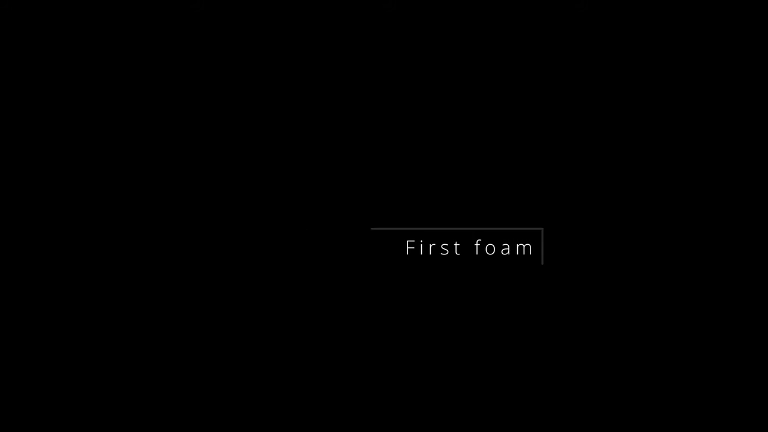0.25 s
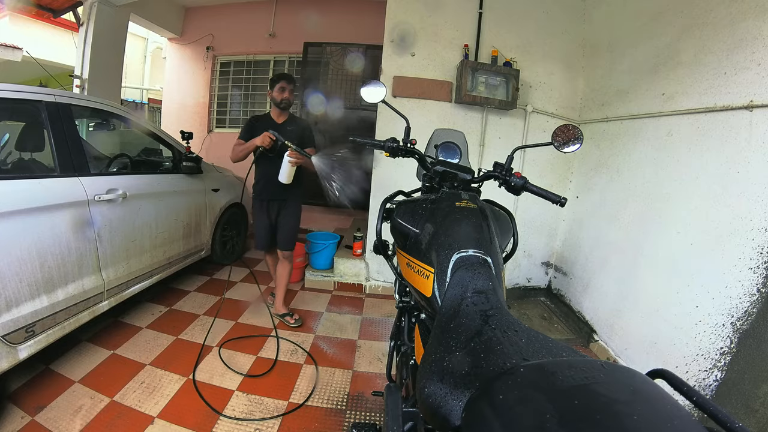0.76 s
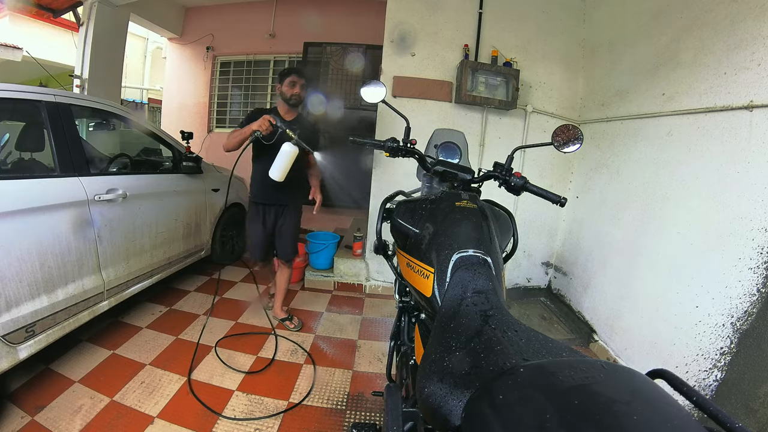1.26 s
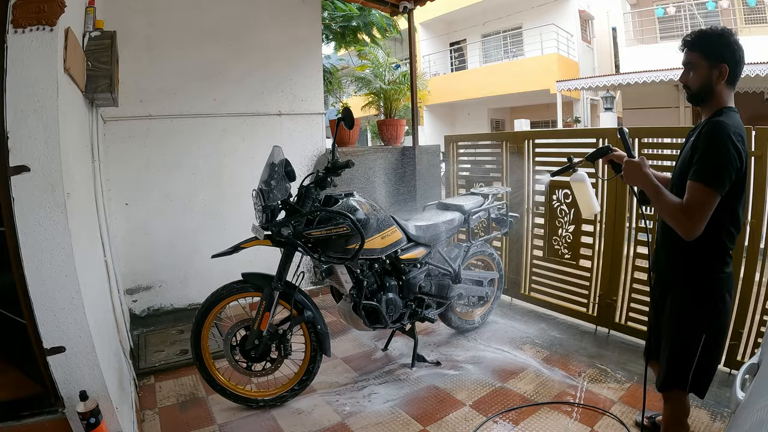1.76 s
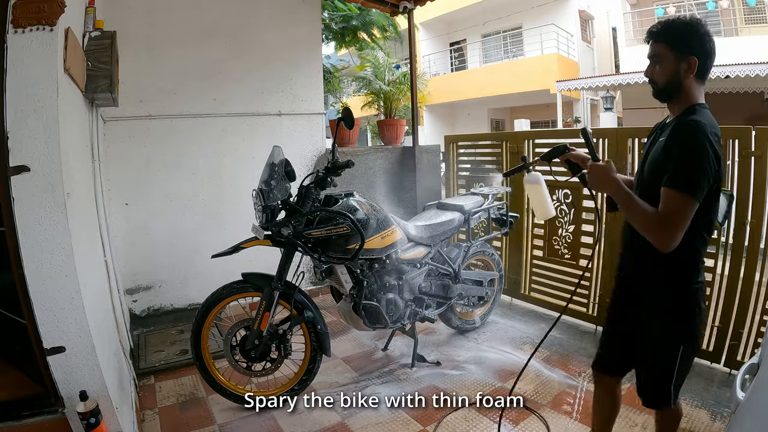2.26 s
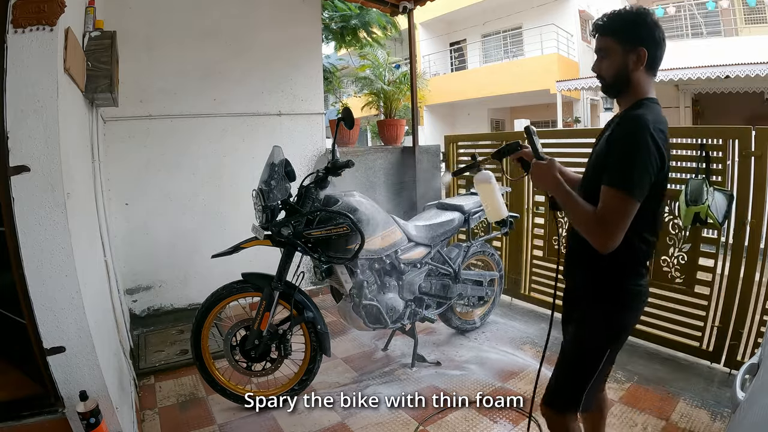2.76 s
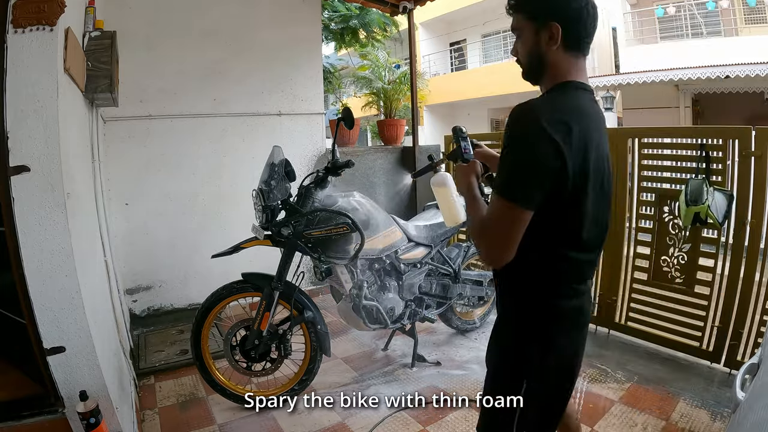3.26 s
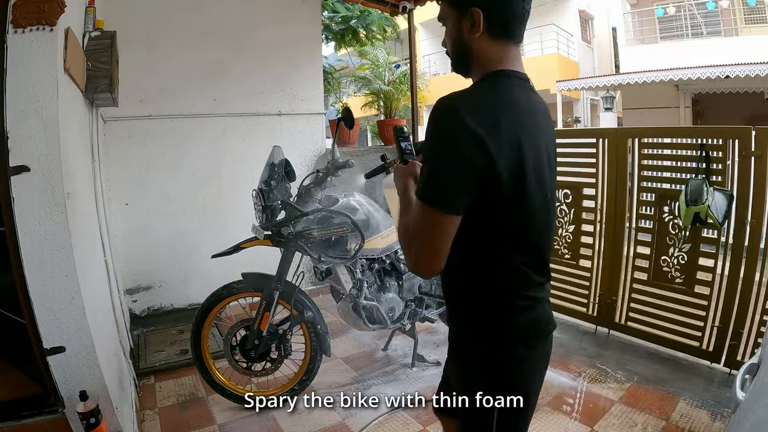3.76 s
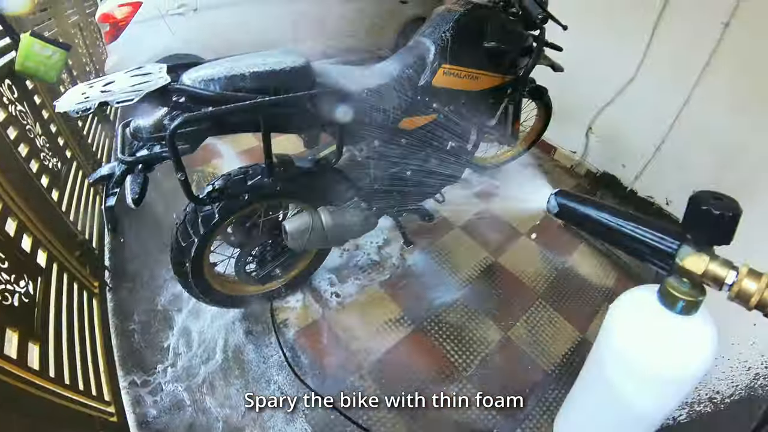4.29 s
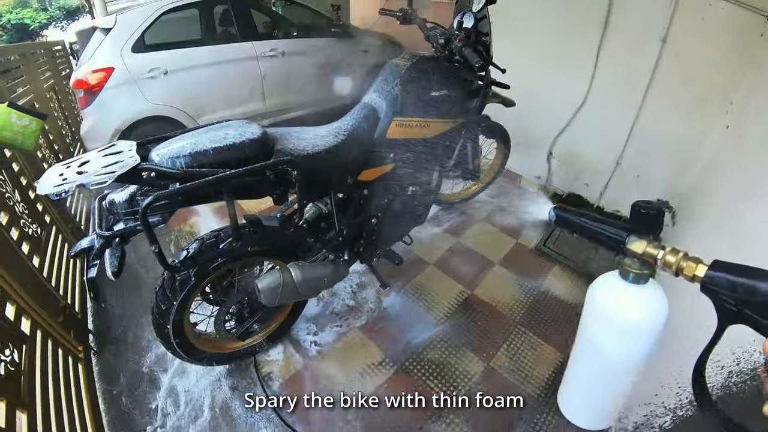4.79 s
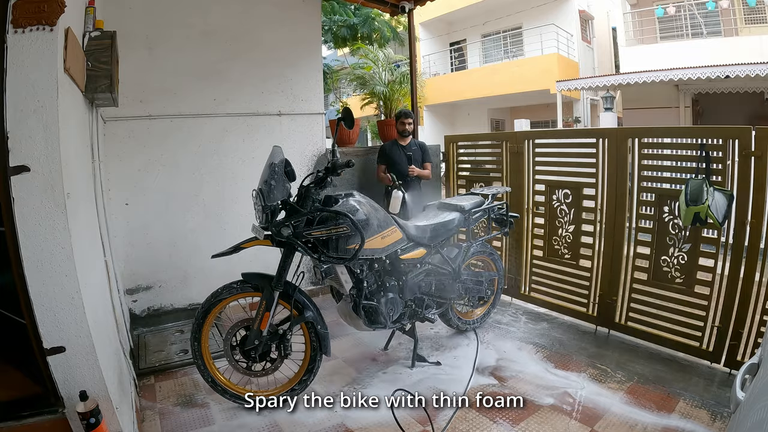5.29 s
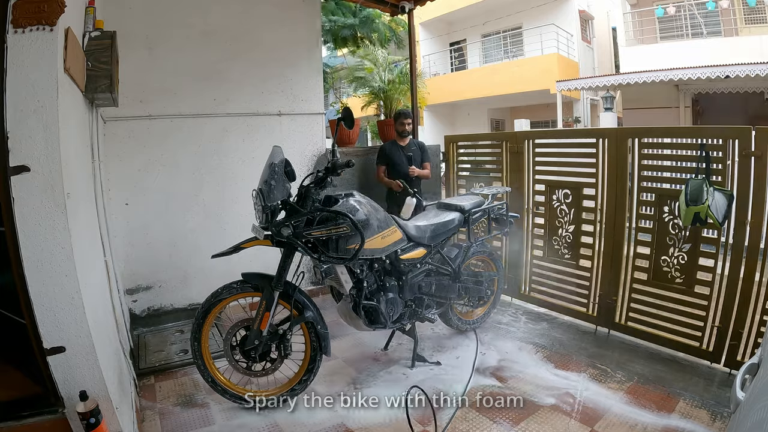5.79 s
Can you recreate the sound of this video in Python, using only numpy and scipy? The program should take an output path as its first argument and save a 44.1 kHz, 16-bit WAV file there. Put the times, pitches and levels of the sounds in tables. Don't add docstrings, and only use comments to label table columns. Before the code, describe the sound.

After half a second of silence, a trigger clacks, an electric pressure washer spins up, and foam spray hisses steadily in a walled yard.

```python
import sys
import numpy as np
from scipy import signal
from scipy.fft import rfft, irfft, next_fast_len
from scipy.io import wavfile
from scipy.ndimage import uniform_filter1d, map_coordinates

SR = 44100
rng = np.random.default_rng(int(sys.argv[2]) if len(sys.argv) > 2 else 0)


def voltage_ratio(level):
    return 10 ** (np.asarray(level, float) / 20)


def store_wav(level_fs):
    pcm = np.round(np.clip(np.atleast_2d(level_fs), -1, 1) * 32767)
    wavfile.write(sys.argv[1], SR, pcm.T.astype(np.int16))


N = 266231


def unit(x):
    return x / np.sqrt(np.mean(x ** 2) + 1e-20)


def curves(rows):
    s, *cols = np.transpose(rows)
    return [np.interp(np.arange(N) / SR, s, c) for c in cols]


def held(starts, rows, fade_s):
    s = np.repeat(starts, 2)[2:] + fade_s * np.tile([-.5, .5], len(starts) - 1)
    return curves(np.column_stack([s, np.repeat(rows, 2, axis=0)[1:-1]]))


def wobble(rate):
    coarse = np.arange(0, N + 64, 64)
    knots = rng.standard_normal(int(N * rate / SR) + 4)
    return np.interp(np.arange(N), coarse, map_coordinates(knots, [coarse * rate / SR]))


def swell(s, length_s):
    return np.exp(-((np.arange(N) / SR - s) / length_s) ** 2)


def after(s):
    return np.clip((np.arange(N) / SR - s) * 1000, 0, 1)


def coloured(x, points):
    m = next_fast_len(N + 8192)
    hz, db = np.transpose(points)
    log_hz = np.log(np.fft.rfftfreq(m, 1 / SR) + 1)
    gain = voltage_ratio(np.interp(log_hz, np.log(hz + 1), db, -120, -120))
    return unit(irfft(rfft(x, m) * gain, m)[:N])


def rush(patchy_db, streak=10):
    z = signal.stft(rng.standard_normal(N + 512), nperseg=512)[2]
    field = uniform_filter1d(rng.standard_normal(z.shape), size=60 // streak + 1, axis=0)
    field = uniform_filter1d(field, size=streak, axis=1)
    return signal.istft(z * voltage_ratio(patchy_db * unit(field)), nperseg=512)[1][:N]


SPOTS = [
    0,
    1.81,
    2.6,
    3.832,
    4.99,
]


def spot_shares(fade_s):
    past = [np.clip((np.arange(N) / SR - s) / fade_s + .5, 0, 1) for s in SPOTS[1:]]
    return -np.diff([np.ones(N), *past, np.zeros(N)], axis=0)


# frequency in Hz, level in dB per Hz.
SCRAP_COLOUR = [(24, -38), (40, -17), (443, -8.5), (1110, -21), (1290, -20), (1570, -33), (1870, -26.5),
                (8910, -35.5), (15000, -57)]
# start in seconds, end in seconds, level in dB.
SCRAP_SPAN = (0.528, .561, -33.5)
# frequency in Hz, level in dB per Hz.
YARD_COLOUR = [(30, -30), (91, -5), (196, -5.5), (763, -15), (2000, -44), (2400, -48), (8380, -41),
               (14300, -80)]


def yard():
    start, end, db = SCRAP_SPAN
    scrap = voltage_ratio(db) * (after(start) - after(end)) * coloured(rush(.8), SCRAP_COLOUR)
    return scrap + voltage_ratio(-48) * after(start) * coloured(rush(0.63), YARD_COLOUR)


# mode in Hz, level in dB, 60 dB decay in seconds.
LEVER_MODES = [(2210, -10, .12), (3030, -12, .08), (5150, -0.5, .08), (6800, -10, 0.047)]
# start in seconds, peak in dB.
CLACKS = [
    (0.6491, -8),
    (.657, -22),
    (.671, -27),
]
# frequency in Hz, level in dB per Hz.
BURST_COLOUR = [(65, -40), (250, -3), (430, -11), (680, -2.5), (1500, -17.5), (2850, -17), (9080, -25),
                (14500, -50)]
# frequency in Hz, level in dB per Hz.
VALVE_COLOUR = [(1300, -14.5), (1650, -14), (1900, -3.5), (2100, 1), (2300, -4), (2600, -15), (3200, -27)]
LEAK_S, LEAK_DB = .628, -51
BURST_S, BURST_DB, BURST_HOLD_S, BURST_FALL_DB_PER_S = .6475, -24.5, 0.03, 170
LANCE_DB, LANCE_S, LANCE_LENGTH_S = -29.5, 0.7, 0.046


def trigger():
    clacks, t = np.zeros(N), np.arange(SR // 5) / SR
    onset = np.sin(np.pi / 2 * np.clip(t / .0012, 0, 1)) ** 2
    for s, db in CLACKS:
        ring = sum(voltage_ratio(level + rng.normal(0, 2.2) - 60 * t / t60) * np.sin(2 * np.pi * hz * t)
                   for hz, level, t60 in LEVER_MODES)
        clacks[round(s * SR):][:len(t)] += voltage_ratio(db - 23) * onset * ring
    falling_s = np.clip(np.arange(N) / SR - BURST_S - BURST_HOLD_S, 0, 1)
    burst = voltage_ratio(BURST_DB - BURST_FALL_DB_PER_S * falling_s) * after(BURST_S)
    leak = voltage_ratio(LEAK_DB) * (after(LEAK_S) - after(0.75))
    water = (burst + leak) * coloured(rush(.6), BURST_COLOUR)
    lance = voltage_ratio(LANCE_DB) * swell(LANCE_S, LANCE_LENGTH_S) * after(BURST_S)
    return clacks + water + lance * coloured(rng.standard_normal(N), VALVE_COLOUR)


# start in seconds, thud in dB, thud pitch in Hz, slap in dB.
BUMPS = [(.648, -21, 660, -24), (.824, -26, 560, -45), (3.834, -19, 220, -35), (3.841, -7, 310, -22),
         (3.851, -7.5, 300, -18), (3.863, -11, 280, -23), (3.870, -14, 170, -30), (3.877, -11, 260, -24),
         (3.905, -11, 240, -28), (3.935, -14, 250, -32), (3.957, -19, 170, -30)]
THUD_T60_S, THUD_RISE_CYCLES = .065, 1.2


def bumps():
    out, t = np.zeros(N), np.arange(SR // 10) / SR
    slap = coloured(rng.standard_normal(N), [(900, -36), (2000, 3), (3000, 1), (3600, -6)])
    onset = np.sin(np.pi / 2 * np.clip(t / .0015, 0, 1)) ** 2
    for s, db, hz, slap_db in BUMPS:
        start = round(s * SR)
        rise = np.sin(np.pi / 2 * np.clip(t * hz / THUD_RISE_CYCLES, 0, 1))
        overtone = 0.57 * voltage_ratio(-60 * t / 0.052) * np.sin(2 * np.pi * 2.21 * hz * t)
        thud = rise * np.sin(2 * np.pi * hz * t) + overtone
        body = voltage_ratio(db - 3.5 - 60 * t / THUD_T60_S) * thud
        smack = voltage_ratio(slap_db - 60 * t / 0.025) * slap[start:][:len(t)]
        out[start:][:len(t)] += onset * (body + smack)
    return out


# frequency in Hz, level in dB per Hz.
BUFFET_COLOUR = [(15, -20), (30, 1), (45, 6.5), (75, 3), (110, 1.5), (140, -5)]
# centre in seconds, buffet in dB, length in seconds.
GUSTS = [(.9, -50, 0.12), (1.26, -59, .08), (1.796, -47, .06), (2.29, -42, 0.046), (3.627, -61, 0.17),
         (4.09, -58, .07), (4.41, -52, .08), (4.79, -56, .07), (5.03, -50, .07), (5.328, -40, 0.061),
         (5.617, -44, 0.15), (5.89, -53, .04)]


def wind():
    gusts = sum(voltage_ratio(peak_db) * swell(s, length) for s, peak_db, length in GUSTS)
    level = (voltage_ratio(-59) + gusts) * voltage_ratio(2.0 * wobble(7.8)) * after(.648)
    return level * coloured(rush(0.87), BUFFET_COLOUR)


# time in seconds, shaft speed in Hz.
SPIN = [(.70, 22), (.78, 38), (.83, 45.5), (.87, 47.1), (1.8, 47.14), (2.0, 47.2), (3.4, 47.17),
        (6.04, 47.19)]


def shaft():
    hz = curves(SPIN)[0] * (1 + 0.00061 * wobble(5.92))
    return 2 * np.pi * np.cumsum(hz) / SR


STANCES = [0, 1.4, 1.81, 2.33, 3.1, 3.55, 3.83, 4.0, 4.65, 4.99, 5.6]
# stroke in dB, 2nd in dB, 3rd in dB, 4th harmonic in dB.
HUM = [(-35, -29.5, -36, -41), (-33, -31, -33.5, -41), (-39, -55, -50, -45), (-40, -52, -31.5, -50),
       (-40, -45, -33, -56), (-40, -32, -32, -56), (-36, -42, -55, -55), (-45, -32, -55, -47),
       (-40, -34, -50, -44), (-54, -30.5, -55, -35), (-50, -30.5, -50, -32)]
# shaft order 14 in dB, 15 in dB, 16 in dB, 18 in dB.
WHINE = [(-31.5, -36, -42, -46), (-32, -38, -41, -44), (-38, -34, -36, -34), (-37, -33, -37, -36),
         (-31, -30, -44, -39), (-34, -33, -47, -42), (-31, -50, -36, -55), (-36, -37, -50, -56),
         (-40, -31, -48, -41), (-41, -34.5, -56, -41), (-43, -35, -44, -44)]
WHINE_ORDERS = (14, 15, 16, 18)
# shaft order, level in dB.
MINOR = [
    [(4, -49), (8, -45), (11, -44), (17, -39), (20, -43), (21, -47), (26, -43), (39, -46), (40, -42)],
    [(5, -45), (11, -47), (13, -42), (17, -44), (21, -47), (26, -47), (39, -50), (40, -46)],
    [(4, -43), (8, -43), (11, -50), (13, -43), (17, -45), (26, -46), (39, -49), (40, -50)],
    [(4, -45), (8, -44), (11, -41), (13, -43), (17, -48), (21, -50), (40, -51)],
    [(4, -43), (11, -42), (13, -48), (17, -44), (26, -43), (39, -50), (40, -47), (44, -50)],
]
# time in seconds, level in dB, pitch in Hz.
START_HUM = [(.74, -57, 181.3), (.79, -35, 194), (.86, -25.5, 201), (.885, -26, 188), (.92, -60, 187)]
STANCE_FADE_S = 0.064
HUM_FADE_DB, WHINE_FADE_DB, FADES_PER_S = .8, 1.3, 4.01
TONES_DB = -0.52
SURGE_S, SURGE_DB, SURGE_LENGTH_S = .89, 0.5, .06


def hum(turn):
    def tone(gain, order, drift_db):
        fade = voltage_ratio(drift_db * wobble(FADES_PER_S))
        phase = order * turn + 0.048 * order * wobble(8) + rng.uniform(0, 2 * np.pi)
        return gain * fade * np.sqrt(2) * np.sin(phase)

    load = np.clip((np.arange(N) / SR - .78) / 0.086, 0, 1) ** 2
    stroke_levels = held(STANCES, HUM, STANCE_FADE_S)
    strokes = sum(tone(voltage_ratio(db), 3 * k, HUM_FADE_DB) for k, db in enumerate(stroke_levels, start=1))
    whine_levels = held(STANCES, WHINE, STANCE_FADE_S)
    whine = sum(tone(voltage_ratio(db), k, WHINE_FADE_DB) for k, db in zip(WHINE_ORDERS, whine_levels))
    shares, spots = spot_shares(.04), [dict(spot) for spot in MINOR]
    minor = 0
    for order in sorted(set().union(*spots)):
        gain = voltage_ratio([spot.get(order, -120) for spot in spots]) @ shares
        minor = minor + tone(gain, order, 3.3)
    strain_db, strain_hz = curves(START_HUM)
    strain = voltage_ratio(strain_db) * np.sin(2 * np.pi * np.cumsum(strain_hz) / SR)
    level = load * voltage_ratio(TONES_DB + SURGE_DB * swell(SURGE_S, SURGE_LENGTH_S))
    return level * (strokes + whine + load ** 2 * minor) + strain


# drum in dB, hose in dB, shell in dB, valve in dB.
CASING = [(-37, -34.5, -31.5, -33), (-37, -33.5, -33, -31), (-34, -35.5, -29, -30.5),
          (-34.5, -35.5, -29.5, -30), (-34.5, -36, -29.5, -30.2), (-33, -34.5, -29, -30.5),
          (-33.5, -30.5, -30.5, -28.5), (-35, -32.5, -30.5, -28.5), (-36.5, -33, -30.5, -27),
          (-32.5, -32.5, -30, -27), (-32, -30.5, -30.5, -28.5)]
# drum in dB, hose in dB, shell in dB, valve in dB.
CASING_DRIFT_DB = (0.84, 0.72, .4, 1.2)
# frequency in Hz, level in dB per Hz.
DRUM_COLOUR = [(60, -43), (110, -11.5), (160, -1.5), (250, 3.5), (330, 2.5), (400, -2.5), (520, -28)]
# frequency in Hz, level in dB per Hz.
HOSE_COLOUR = [(300, -14), (400, -8), (500, -7), (600, -8.5), (750, -10)]
# frequency in Hz, level in dB per Hz.
SHELL_COLOUR = [(450, -60), (600, -7.5), (700, 1), (800, 2), (950, -1.5), (1250, -5), (1550, -12),
                (1900, -15)]
LOAD_S, LOAD_RISE_S, IDLE_DB = (0.85, 0.78, 0.825, 0.817), .05, (-2, -13, -11, -16)
JOLT_S, JOLT_DB, JOLT_FADE_S = 3.832, (2.5, 1.8, 2.5, 3), 0.076


def casing(turn):
    t = np.arange(N) / SR
    shake = after(JOLT_S) * np.exp(-abs(t - JOLT_S) / JOLT_FADE_S)
    levels = []
    parts = zip(held(STANCES, CASING, STANCE_FADE_S), LOAD_S, IDLE_DB, CASING_DRIFT_DB, JOLT_DB)
    for db, s, idle, drift, jolt in parts:
        unloaded = np.clip(1 - (t - s) / LOAD_RISE_S, 0, 1)
        levels.append(db + idle * unloaded + drift * wobble(5.2) + jolt * shake)
    drum_db, hose_db, shell_db, valve_db = levels

    def beat(stroke, once):
        return 1 + stroke * np.cos(3 * turn) + once * np.cos(turn)

    drum = voltage_ratio(drum_db + 2.5) * coloured(rush(1.16), DRUM_COLOUR)
    hose = voltage_ratio(hose_db + 2.5) * coloured(rush(1.34), HOSE_COLOUR)
    shell = coloured(beat(0.12, 0.065) * rush(1.1), SHELL_COLOUR)
    shell_gain = voltage_ratio(shell_db + 0.5 + SURGE_DB * swell(SURGE_S, SURGE_LENGTH_S))
    valve = coloured(beat(0.073, 0.053) * rush(1.85, streak=60), VALVE_COLOUR)
    return drum + hose + shell_gain * shell + voltage_ratio(valve_db - 1.1) * valve


# spatter in dB, jet in dB, mist in dB, air in dB.
SPRAY = [(-31, -29, -35, -47.5), (-30, -27.5, -36.5, -49), (-29.5, -27.5, -35.5, -48),
         (-29, -28, -35.5, -51), (-30, -29, -36, -50.5)]
# time in seconds, level in dB.
PRESSURE = [(.74, -23), (.83, -28), (.86, -12), (.95, 0.7), (1.3, 0), (2.0, 0.5), (2.75, 0.3), (3.1, -0.5),
            (3.8, -0.4), (3.96, 1), (4.3, -1.1), (5.0, -0.7), (5.2, 0.1), (5.97, -1.8), (6.03, -1.5),
            (6.04, -15)]
# spatter, jet, mist, air, each in dB per dB.
FOLLOWS = (0.75, 0.99, 0.87, 1.2)
# centre in seconds, spatter in dB, hiss in dB, length in seconds.
STRIKES = [
    (1.47, 1.2, 1, 0.21),
    (2.783, .4, 2.2, .02),
    (3.24, 3, .9, 0.049),
    (3.85, 1.5, -5.5, 0.024),
    (3.93, -1.5, 2, 0.022),
    (5.033, 0.5, 1.6, 0.036),
]


def spray_levels():
    pressure_db, = curves(PRESSURE)
    spatter_db = sum(db * swell(s, length) for s, db, _, length in STRIKES)
    hiss_db = sum(db * swell(s, length) for s, _, db, length in STRIKES)
    strikes = [spatter_db, hiss_db, hiss_db, hiss_db]
    return [db + follows * pressure_db + strike + 0.18 * wobble(4.78)
            for db, follows, strike in zip(held(SPOTS, SPRAY, 0.018), FOLLOWS, strikes)]


# centre in Hz, width in Hz, level in dB.
NOZZLE = [
    [(3760, 440, -2), (5200, 790, 5), (6260, 1100, -2), (10500, 770, -8)],
    [(3650, 430, -1.5), (6340, 940, -4)],
    [(3530, 390, -0.5), (6270, 670, -1)],
    [(4060, 680, 1), (6100, 1700, 3), (9400, 550, -6)],
    [(4220, 1400, -1), (6000, 430, 0), (10400, 970, -10)],
]


def whistles():
    m = next_fast_len(N)
    hz, noise = np.fft.rfftfreq(m, 1 / SR), rfft(rush(2.0, streak=30), m)
    sung = []
    for peaks in NOZZLE:
        gain = sum(voltage_ratio(db) / (1 + (2 * (hz - centre) / max(width, 300)) ** 2)
                   for centre, width, db in peaks)
        sung.append(unit(irfft(noise * gain, m)[:N]))
    return np.array(sung)


# frequency in Hz, level in dB per Hz.
SPATTER_COLOUR = [(2000, -4), (2900, -5.5), (3500, -2), (4200, -1), (5000, -5), (6500, -15)]
# frequency in Hz, level in dB per Hz.
JET_COLOUR = [(3800, -27), (5000, -7.5), (6200, -1.5), (6900, -2.5), (7800, -8.5), (9000, -19.5),
              (11000, -52)]
# frequency in Hz, level in dB per Hz.
MIST_COLOUR = [(6000, -23), (7800, -1), (10300, -1.5), (11500, -8), (12500, -15), (14000, -45)]
# frequency in Hz, level in dB per Hz.
AIR_COLOUR = [(10000, -25), (11800, -5.5), (13000, -5), (14500, -14), (15200, -15), (15700, -22)]
# centre in seconds, level in dB, length in seconds.
GLINTS = [
    (3.92, -36.5, .04),
    (4.5, -37, .22),
]
GLINT_HZ, GLINT_WIDTH_HZ = 9460, 450


def spray():
    spatter_db, jet_db, mist_db, air_db = spray_levels()
    gulp_db = 0.66 * wobble(14) + 0.12 * wobble(30)
    drops = (rng.random(N) < 900 / SR) * rng.standard_normal(N)
    drops = unit(drops * voltage_ratio(2.2 * rng.exponential(size=N).clip(0, 3)))

    def wet(share):
        return rush(1.47, streak=30) + share * drops

    spatter = voltage_ratio(spatter_db - 0.15) * coloured(wet(0.38), SPATTER_COLOUR)
    jet = voltage_ratio(jet_db - 0.33) * coloured(wet(0.064), JET_COLOUR)
    mist = voltage_ratio(mist_db + 1.57) * coloured(wet(0.15), MIST_COLOUR)
    air = voltage_ratio(air_db - 2.0) * coloured(wet(.1), AIR_COLOUR)
    sung = voltage_ratio(jet_db - 5.5) * np.sum(spot_shares(0.022) * whistles(), axis=0)
    band = [(GLINT_HZ - 2 * GLINT_WIDTH_HZ, -25), (GLINT_HZ, 0), (GLINT_HZ + 2 * GLINT_WIDTH_HZ, -25)]
    glint_gain = sum(voltage_ratio(db) * swell(s, length) for s, db, length in GLINTS)
    glint = glint_gain * coloured(rng.standard_normal(N), band)
    return voltage_ratio(gulp_db) * (spatter + jet + mist + air + sung + glint)


# time in seconds, centre in Hz, level in dB.
SWEEP = [(3.95, 639, -45), (4.2, 646.3, -29.5), (4.6, 704, -35), (4.9, 727, -33.5), (5.25, 774, -33.5),
         (5.5, 785, -47), (5.7, 760, -50)]


def echo_sweep():
    hz, db = curves(SWEEP)
    angle = 2 * np.pi * np.cumsum(hz) / SR
    band = wobble(90) * np.cos(angle) + wobble(90) * np.sin(angle)
    return voltage_ratio(db) * after(SWEEP[0][0]) * unit(band)


def scene():
    turn, t = shaft(), np.arange(N) / SR
    running = np.clip((t - .73) / 0.041, 0, 1)
    machine = running * (hum(turn) + casing(turn) + echo_sweep() + spray())
    mono = yard() + trigger() + bumps() + wind() + machine
    mono = mono * (1 - 0.9 * np.exp(-((t - 3.8315) / 0.0012) ** 2))
    return np.array([mono, mono])


def low_pass(x):
    return signal.sosfilt(signal.butter(12, 15710, fs=SR, output="sos"), x)


def record(dry):
    return low_pass(dry)


dry = scene()
out = record(dry)
store_wav(out)
```